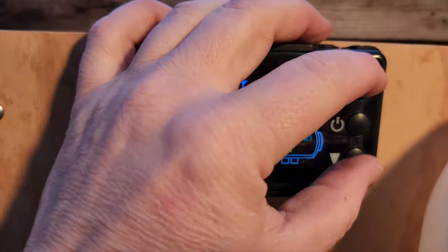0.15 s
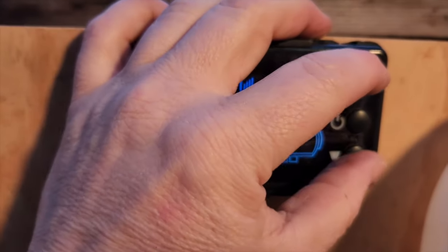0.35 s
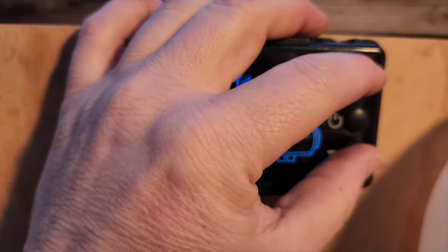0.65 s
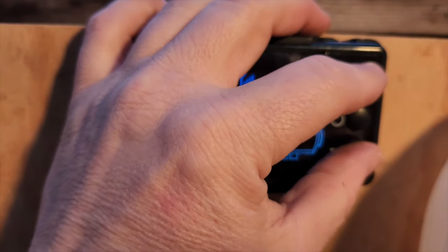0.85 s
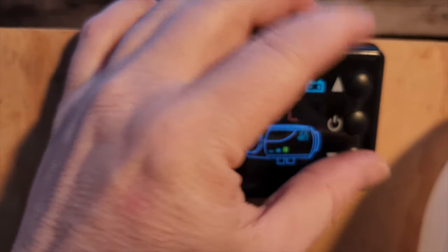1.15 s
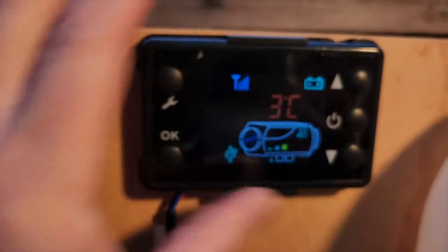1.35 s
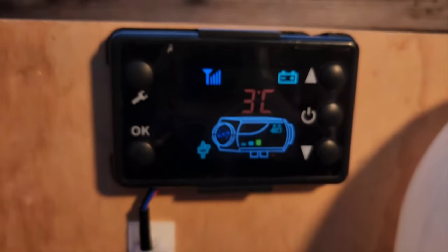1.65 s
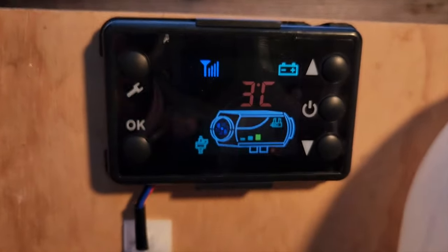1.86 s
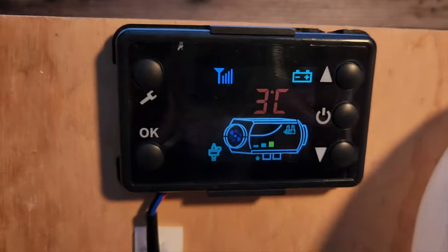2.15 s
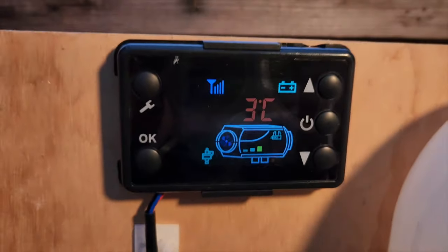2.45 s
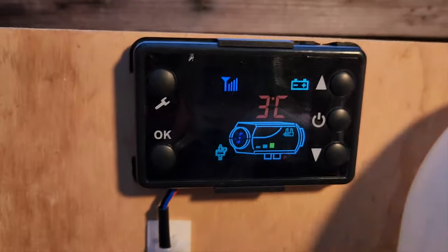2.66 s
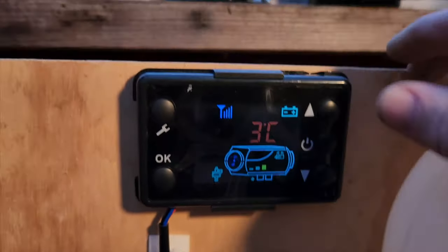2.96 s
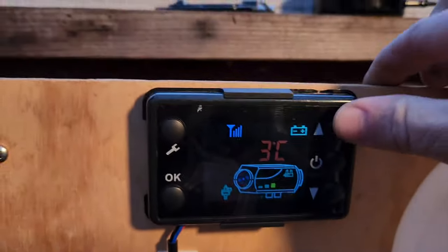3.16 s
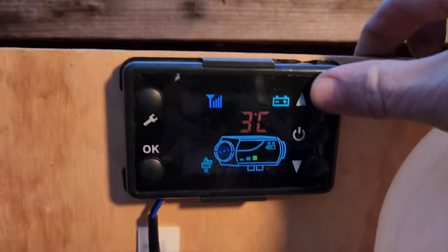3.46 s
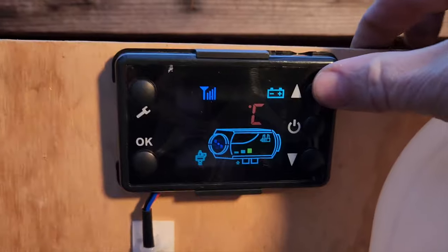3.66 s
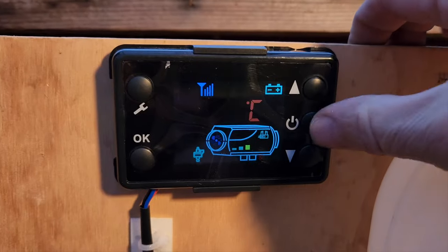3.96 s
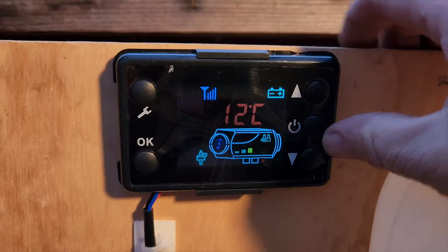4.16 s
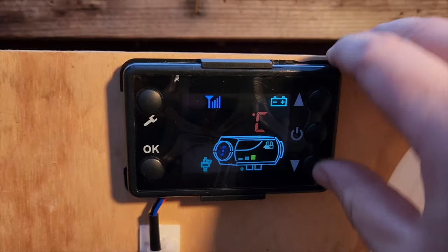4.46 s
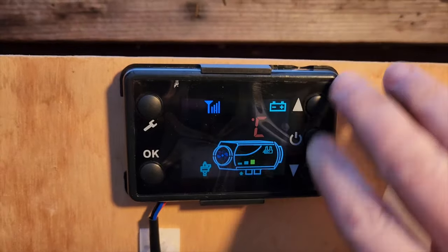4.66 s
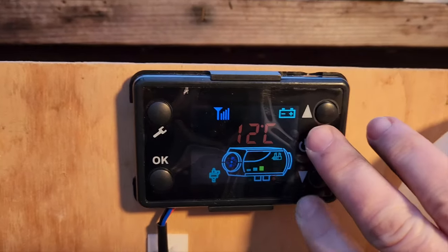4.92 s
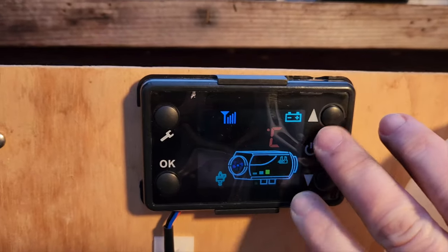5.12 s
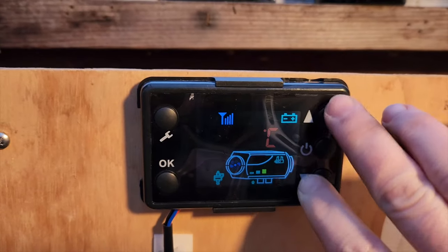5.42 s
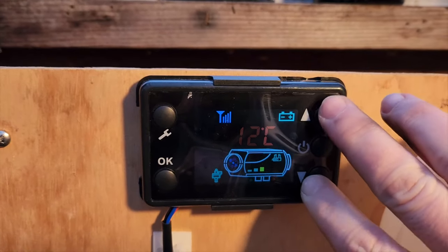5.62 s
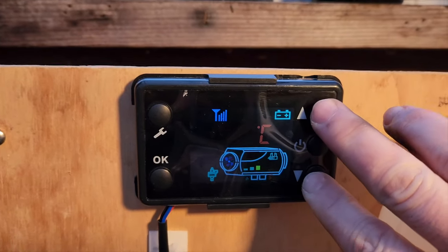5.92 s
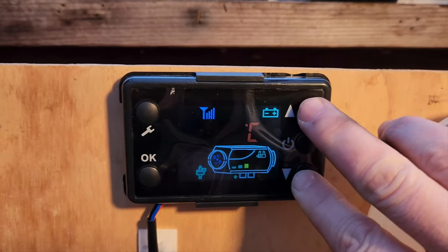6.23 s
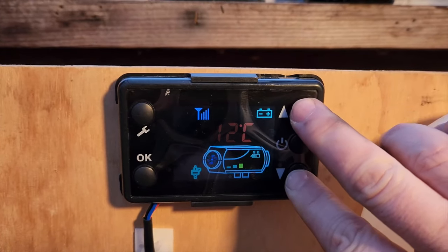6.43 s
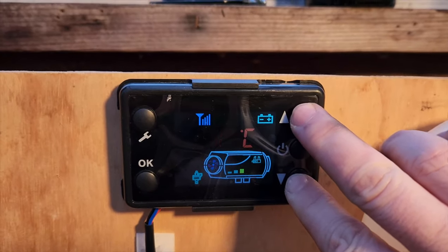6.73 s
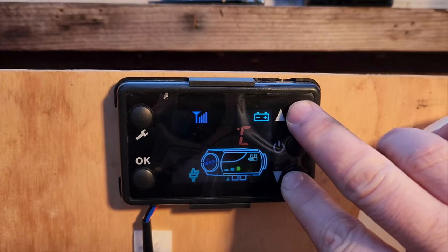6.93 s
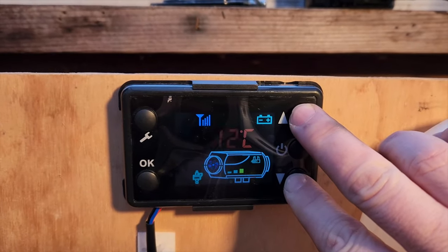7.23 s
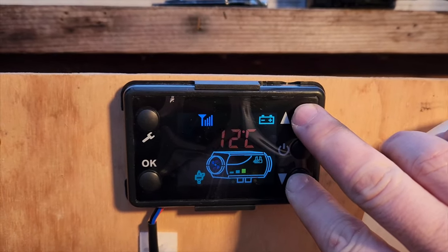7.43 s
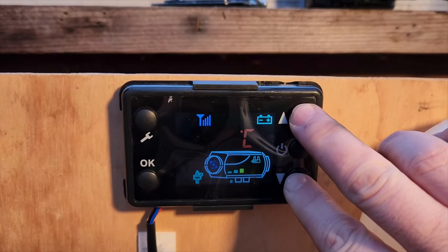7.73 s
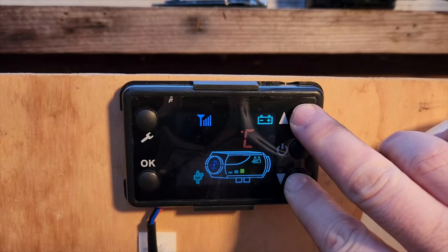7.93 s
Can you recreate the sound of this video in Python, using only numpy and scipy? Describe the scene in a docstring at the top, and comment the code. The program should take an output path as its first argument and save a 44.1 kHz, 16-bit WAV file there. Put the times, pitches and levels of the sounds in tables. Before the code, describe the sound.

For about eight seconds a diesel air heater runs in a small wooden room: a low, boomy exhaust drone near the bottom of hearing, fluttering with brief soft flares, the strongest around 4.9 s, beneath rushing air and a thin blower whine. From 0.25 s the fuel pump ticks evenly, a little over twice a second, each crisp metallic tick followed at once by a duller knock; the beat quickens barely perceptibly after 4.7 s. Close by, a hand works a plastic panel: faint clicks at the start, more at 0.7-1.1 s with a scuff, a cluster at 2.3-2.7, soft bumps near 2.9, strong clicks at 3.3 and 4.5, small ones around 5.3, another at 6.45. Sleeve rustle comes at 1.2 s and intermittently from 1.8 to 4.8. A faint skin squeak creeps in around 7.3-7.7 s. Short, diffuse room echoes.

```python
"""A flame drones in an exhaust pipe and a blower whines faintly: a diesel air heater in a small wooden room.
The dosing pump ticks a little over twice a second, each stroke followed by its plunger's duller return knock.
Close by, a hand works the plastic control panel: buttons click, skin scuffs and squeaks, a sleeve rustles.
Drone, air and friction are shaped noise; flares are sines; ticks and clicks are impacts with ringing modes."""
import sys
import numpy as np
from scipy import signal
from scipy.fft import rfft, irfft
from scipy.io import wavfile
from scipy.ndimage import uniform_filter1d

SR = 44100
rng = np.random.default_rng(int(sys.argv[2]) if len(sys.argv) > 2 else 0)


def unload_wav(signal):
    """Save mono or channel-first audio to the path in sys.argv[1] as 16-bit WAV at rate SR, clipped to [-1, 1]."""
    wavfile.write(
        sys.argv[1],
        SR,
        np.round(np.clip(np.atleast_2d(signal).T, -1, 1) * 32767).astype(np.int16),
    )


N = 356548

# sound colour of the plastic case: (frequency [Hz], density [dB per Hz])
CASE_COLOUR = [(200, -15.5), (600, -1.5), (1000, 5), (1700, 8), (2400, -0.5), (3800, -2), (5000, -3),
               (6000, -7.5), (7500, -16.5), (9500, -26.5), (12500, -23), (16000, -22.5)]


def gain_of(db):
    """Decibels to amplitude."""
    return 10 ** (np.asarray(db) / 20)


def evened(x):
    """Scales to an rms of one."""
    return x / np.sqrt(np.mean(x ** 2) + 1e-20)


def peaked(x):
    """Scales a stereo hit so that the loudest 2 ms of its middle have an rms of one."""
    return x / np.sqrt(uniform_filter1d(x.mean(0) ** 2, size=88).max())


def read(points, hz):
    """Reads a spectrum on a log-frequency axis."""
    f, value = np.transpose(points)
    return np.interp(np.log(hz + 1), np.log(f + 1), value)


def follow(curve):
    """Reads a curve at every sample."""
    return np.interp(np.arange(N) / SR, *np.transpose(curve))


def ramp(share):
    """A smooth step from zero to one."""
    return np.sin(np.pi / 2 * np.clip(share, 0, 1)) ** 2


def panned(balance_db):
    """Left and right gains for a left-right level difference."""
    return gain_of(np.array([[.5], [-.5]]) * balance_db)


def add(mix, s, sound):
    """Mixes a stereo sound in at time s."""
    part = mix[:, max(round(s * SR), 0):][:, :sound.shape[1]]
    part += sound[:, :part.shape[1]]


def resonant(hz, centre_hz, width_hz):
    """Gain of a resonance with steep skirts; the width is taken at half amplitude."""
    return 1 / (1 + (2 * (hz - centre_hz) / width_hz) ** 2)


def noise(gain):
    """Stereo noise with the spectrum gain(hz), most alike in both ears in the bass; its middle has rms one."""
    # between the two microphones: (frequency [Hz], likeness [0-1])
    likeness = [(80, .995), (150, .97), (280, .82), (550, .68), (1100, .1), (2200, .3), (4500, 0),
                (14000, 0)]
    hz = np.fft.rfftfreq(N, 1 / SR)
    left, other = rfft(rng.standard_normal((2, N)))
    same = np.clip(read(likeness, hz), -1, 1)
    right = same * left + np.sqrt(1 - same ** 2) * other
    x = irfft(np.array([left, right]) * gain(hz), N)
    return x / x.mean(0).std()


def coloured(x, points, size=4096):
    """Causal minimum-phase filter with the given spectrum, so that attacks stay sharp."""
    log_gain = np.log(gain_of(read(points, abs(np.fft.fftfreq(size, 1 / SR)))))
    response = np.exp(np.conj(signal.hilbert(log_gain)))
    taps = np.fft.ifft(response).real[:size // 2]
    return signal.fftconvolve(x, taps[None], axes=1)[:, :x.shape[1]]


def struck(colour, modes, clatter_t60, direct_db, scatter_db, scatter_t60, ring_db, balance_db, edge_db,
           echo_db, size=4096):
    """One blow: edge-filtered impact, its echo, brief clatter, scatter off nearby boards and ringing modes."""
    board_echo_s = 0.00278  # one return off the nearest board
    t = np.arange(size) / SR
    impact = evened(signal.unit_impulse(size, 22) * np.ones((2, 1)))
    impact = coloured(impact, [(2500, 0), (4800, edge_db / 3), (6200, edge_db)])
    impact = impact + gain_of(echo_db) * np.roll(impact, round(board_echo_s * SR), axis=1)
    clatter, scatter = rng.standard_normal((2, 2, size))
    clatter = evened(clatter * gain_of(-60 * t / clatter_t60) * (1 - np.exp(-t / 0.0002)))
    scatter = evened(scatter * gain_of(-60 * t / scatter_t60) * (1 - np.exp(-t / 0.0016)))
    contact = (gain_of(direct_db) * impact + clatter) * panned(balance_db)
    crack = coloured(contact + gain_of(scatter_db) * scatter * panned(5.8), colour)
    ring = np.zeros((2, size))
    for hz, db, t60, pan_db in modes:
        tone = np.sin(2 * np.pi * (hz * t + rng.random((2, 1))))
        ring += panned(pan_db) * gain_of(db - 60 * t / t60) * tone
    return evened(crack) + gain_of(ring_db) * evened(ring * (1 - np.exp(-t / 0.0027)))


def slips(size, grain_db):
    """Friction: countless tiny slips, a few much larger than the rest."""
    return rng.standard_normal((2, size)) * gain_of(grain_db * np.minimum(rng.exponential(1, size), 6))


def fluttering(spectrum, steadiness, size):
    """Low noise fluttering at random; steadiness (0-1) holds its strength over spans longer than size samples."""
    x = noise(lambda hz: gain_of(read(spectrum, hz)) / (1 + (hz / 300) ** 4))
    power = uniform_filter1d(x.mean(0) ** 2, size=size)
    return evened(x / power ** (np.clip(steadiness, 0, 1) / 2))


def burner():
    """Turbulent burning booms in the pipe over a rougher rumble; in a flare it locks onto the pipe's note."""
    # pipe boom, then rumble, ahead of a low-pass: (frequency [Hz], density [dB per Hz])
    boom_colour = [(20, -44.5), (44, -39.5), (54, -20), (66, -17), (74, -4.5), (79, -0.5), (86, -9.5),
                   (96, -22.5), (120, -37), (200, -76.5)]
    rumble_colour = [(60, -54.5), (85, -5.5), (98, -3), (110, 0), (134, -6), (160, -13), (220, -35.5)]
    # flare-ups: (time of the top [s], length [s], level [dB])
    flares = [(0.68, 0.4, -22.5), (1.11, 0.26, -23.5), (2.0, 0.26, -23), (2.46, 0.2, -23),
              (3.2, 0.26, -23.5), (4.89, 0.32, -19), (5.37, 0.3, -24.5), (6.74, 0.24, -23),
              (7.88, 0.28, -23.5)]
    boom_db, ease_db_per_s, rumble_db = -26, -0.3853, -29.5
    pipe_hz, pipe_spread = 79.2, 0.03  # spread as a share of the note
    t = np.arange(N) / SR
    boom = fluttering(boom_colour, steadiness=0.89, size=7000) * gain_of(boom_db + ease_db_per_s * t)
    for (s, length_s, db), (detune, phase) in zip(flares, rng.uniform(-1.01, 1, (len(flares), 2))):
        lock = ramp(1 - 2 * abs(t - s) / length_s)
        note_hz = pipe_hz * (1 + pipe_spread * detune)
        note = evened(np.sin(2 * np.pi * (note_hz * (t - s) + phase)))
        boom = boom * np.sqrt(1 - lock ** 2) + gain_of(db) * lock * note
    # the room's lowest resonance
    room_mode = gain_of(-51.5) * noise(lambda hz: resonant(hz, centre_hz=35.7, width_hz=7))
    rumble = gain_of(rumble_db) * fluttering(rumble_colour, steadiness=0.72, size=12000)
    return boom + room_mode + rumble


def stroke_times():
    """An even beat that quickens slightly when the controller raises the dose."""
    first_stroke_s, dose_up_s = 0.2522, 4.68
    slow_period_s, fast_period_s = 0.44277, 0.43848
    before = np.arange(first_stroke_s, dose_up_s - slow_period_s / 2, slow_period_s)
    after = np.arange(dose_up_s, N / SR, fast_period_s)
    return np.concatenate([before, after])


def pump():
    """The solenoid slams its plunger home; the spring brings it back with a softer, duller knock."""
    # bare impact, then return knock: (frequency [Hz], density [dB per Hz])
    slam_colour = [(400, -8), (800, -2.5), (1600, -1.5), (2600, -0.5), (3800, -0.5), (4900, -1),
                   (5700, -13.5), (7500, -14.5), (9000, -22), (12400, -10.5), (14000, -14), (16000, -14)]
    knock_colour = [(400, -11.5), (900, -2), (1700, 7), (2500, 10), (3300, -13), (4400, -12.5), (6000, -23),
                    (7400, -19.5), (9000, -42), (13000, -30), (16000, -34.5)]
    # pump and bracket ring: (frequency [Hz], level [dB], t60 [s], left-right [dB])
    pump_modes = [(760, -9, .025, 2), (1040, -7, .025, 3), (1350, 1, .028, 8), (1600, -8, .022, 9),
                  (1800, -6, .02, 9), (2200, -2, .02, 2), (2420, -4, .02, 6), (2700, -6, .018, 2),
                  (2990, -4.5, .022, 5), (3570, 2, .022, 3), (4050, -2, .02, -4), (4350, -4, .02, -3),
                  (4700, -1, .022, 0), (5000, -5, .02, 7), (6020, -14, .022, 10), (7300, -18, .02, 10),
                  (12400, -11, .012, 8)]
    dull_modes = [(hz, db + read(knock_colour, hz), t60, pan_db) for hz, db, t60, pan_db in pump_modes]
    slam_db, knock_db, spread_db = -21, -27, 0.23
    rise_db_per_s = 0.12  # the microphone drifts
    return_s, change_db = .0523, -5

    def slam():
        return peaked(struck(slam_colour, pump_modes, clatter_t60=.007, direct_db=2, scatter_db=6,
                             scatter_t60=.026, ring_db=-4, balance_db=9, edge_db=-8, echo_db=-12))

    def knock():
        return peaked(struck(knock_colour, dull_modes, clatter_t60=0.0097, direct_db=8.0, scatter_db=14.0,
                             scatter_t60=0.013, ring_db=-7.0, balance_db=8.5, edge_db=0.5, echo_db=-15))

    out, usual_slam, usual_knock = np.zeros((2, N)), slam(), knock()
    for s in stroke_times():
        db = rise_db_per_s * s + spread_db * rng.standard_normal()
        # the plunger never seats quite the same way twice
        stroke = peaked(usual_slam + gain_of(change_db) * slam())
        rebound = peaked(usual_knock + gain_of(change_db) * knock())
        add(out, s, gain_of(slam_db + db) * stroke)
        add(out, s + return_s, gain_of(knock_db + db) * rebound)
    return out


def panel():
    """Buttons and case click, some brighter than others; the hand bumps softly."""
    # button and case clicks: (time [s], level before click_trim_db [dB], treble before scaling [dB])
    clicks = [(0.0458, -36, -33), (0.1322, -32.5, -30), (0.713, -28, -17), (0.7601, -23, -15),
              (1.0812, -23.5, -35), (1.1086, -38, -2), (2.293, -31.5, -18), (2.3168, -32, -17),
              (2.3485, -22.5, -9), (2.3787, -33, -25), (2.39, -30, 6), (2.5524, -30, -20),
              (2.5806, -26.5, 53), (2.685, -39.5, -8), (3.146, -27.5, -23), (3.3273, -15, -15),
              (3.4518, -26, -35), (4.4566, -16, -7), (4.4617, -18, -12.5), (4.558, -21, -20),
              (4.6021, -20.5, -26), (4.651, -27, -34), (5.2862, -27.5, -29), (5.336, -32, -27),
              (5.365, -34, -19), (6.4521, -17, -15)]
    # plastic case on its board: (frequency [Hz], level [dB], t60 [s], left-right [dB])
    case_modes = [(860, -7, 0.017, -17), (1288, 0, .04, 9.5), (1773, 6, 0.038, 0.5), (2670, -23, 0.027, 7),
                  (3900, -2, 0.052, -5.5), (4630, 0.5, 0.04, -6.5), (5920, -17.5, 0.022, 0),
                  (7700, -12, 0.032, 15.5)]
    # hand bumps: (time [s], level before bump_trim_db [dB])
    bumps = [(0.748, -28), (1.082, -31), (2.872, -18.5), (2.892, -20), (3.328, -25), (3.451, -28),
             (4.458, -25), (6.454, -23.5)]
    click_trim_db, bump_trim_db = -4, -3
    usual_treble_db, bright_share = -21, 0.89
    out = np.zeros((2, N))
    for s, db, treble_db in clicks:
        click = struck(CASE_COLOUR, case_modes, clatter_t60=0.0066, direct_db=5.0, scatter_db=8.5,
                       scatter_t60=0.018, ring_db=-8.5, balance_db=3, edge_db=-0.5, echo_db=-17.5)
        click = coloured(click, [(1300, 0.017), (10000, bright_share * (treble_db - usual_treble_db))])
        add(out, s, gain_of(db + click_trim_db) * peaked(click))
    t = np.arange(4096) / SR
    bump_colour = [(60, -15), (170, 10.5), (300, 2.5), (700, -21.5), (2500, -37.5), (8000, -58.5)]
    for s, db in bumps:
        push = rng.standard_normal(len(t)) * gain_of(-60 * t / 0.047) * panned(1.5)
        add(out, s, gain_of(db + bump_trim_db) * peaked(coloured(push, bump_colour)))
    return out


def fingers():
    """Skin scuffs the case in short gritty strokes, and squeaks faintly as it creeps on a held button."""
    # scuffs: (time [s], length [s], level before panning and fades [dB])
    scuffs = [(1.051, 0.085, -46.5), (2.864, 0.046, -38.5), (4.439, 0.05, -35), (4.548, 0.17, -49),
              (5.265, 0.14, -48.5)]
    # creeping fingertip: (time [s], level [dB])
    creep = [(7.28, -85), (7.35, -46), (7.45, -59.5), (7.62, -48), (7.72, -61), (7.78, -83)]
    # its squeak: (frequency [Hz], width [Hz], level [dB])
    squeak_bands = [(1930, 270, 3.5), (3180, 250, -5.5), (4260, 510, -12), (6100, 290, -19.5)]

    def squeak_gain(hz):
        return panned(3) * sum(gain_of(db) * resonant(hz, centre, width) for centre, width, db in squeak_bands)

    out = noise(squeak_gain) * gain_of(follow(creep))
    for s, length_s, db in scuffs:
        size = round(length_s * SR)
        grit = coloured(slips(size, grain_db=4), CASE_COLOUR)
        grit = coloured(grit, [(1200, -1), (8000, -5)])
        add(out, s, gain_of(db) * evened(grit) * panned(13.0) * np.sqrt(np.hanning(size)))
    return out


def arm_movement():
    """Strength of the sleeve's rubbing: each brush sets in, is fastest near its middle and falls away."""
    # sleeve brushes: (time [s], length [s], level before fades and sleeve gain [dB])
    brushes = [(1.212, 0.11, -52), (1.75, 0.28, -68.5), (1.929, 0.26, -54.5), (2.092, 0.71, -62),
               (2.72, 0.52, -55.5), (3.61, 0.38, -59.5), (3.97, 0.47, -53.5), (4.319, 0.48, -49)]
    rise_s, fall_s, ends_db, resting_db = 0.085, 0.092, -12, -83.5
    t = np.arange(N) / SR
    out = gain_of(resting_db)
    for s, length_s, db in brushes:
        off_middle = 2 * (t - s) / length_s - 1
        speed = gain_of(db + ends_db * off_middle ** 2)
        out = out + speed * ramp((t - s) / rise_s) * ramp((s + length_s - t) / fall_s)
    return out


def sleeve():
    """Cloth slides in tiny slips, a fizz that follows the arm and catches unevenly."""
    # cloth fizz: (frequency [Hz], density [dB per Hz])
    cloth_colour = [(600, -5), (1500, 3), (2500, 3.5), (4500, 6.5), (6000, -5), (7600, -2), (9400, -10.5),
                    (12500, -1), (16000, -7)]
    level_db, flutter_db, catch_db = 7.0, 1.7, -0.5
    fizz = evened(coloured(slips(N, grain_db=3.5), cloth_colour))
    flutter = evened(uniform_filter1d(rng.standard_normal(N), size=1500))
    catch = evened(uniform_filter1d(rng.standard_normal(N), size=150))
    unevenness = gain_of(level_db + flutter_db * flutter + catch_db * catch)
    return fizz * panned(6.0) * arm_movement() * unevenness


def blower():
    """Rushing air, with whining resonances that grow or fade as the microphone drifts along the board."""
    # air in blower and ducts, ahead of the band edges: (frequency [Hz], density [dB per Hz])
    air_colour = [(90, -3.5), (170, -5), (255, 1), (345, -1), (380, -10), (470, -10.5), (600, -12),
                  (760, -11), (1060, -18), (1500, -22), (1680, -24.5), (2000, -24), (2500, -24),
                  (2800, -33.5), (4700, -37), (6200, -61.5)]
    # its stereo balance: (frequency [Hz], left-right [dB])
    air_balance = [(100, 4), (170, 10.5), (260, 3.5), (330, 0.5), (450, 4), (1400, 0), (2200, 14),
                   (4300, -3.5), (6500, 13)]
    # whine and duct resonances: (frequency [Hz], width [Hz], level [dB], left-right [dB], start-to-end drift [dB])
    whine_bands = [(538, 24, -55, 8, -6), (598.6, 40, -54, 0.5, -0.5), (720, 35, -56.5, 5, 2.5),
                   (1210.5, 53, -49.5, 8, -0.5), (1260, 76, -55.5, 8.5, -4), (1406, 59, -54.5, 23, 6),
                   (1533, 60, -61, 16.5, 5), (2245, 450, -61, -22.5, -18), (3270, 510, -68.5, -14.5, -11.5),
                   (3650, 440, -72, 11.5, 9.5), (4280, 15, -78, -11.5, 6), (4930, 12, -79.5, 2, 1)]

    def air_gain(hz):
        band_edges = hz / (hz + 60) / (1 + (hz / 8000) ** 8)
        return gain_of(read(air_colour, hz)) * panned(read(air_balance, hz)) * band_edges

    out = gain_of(-37.5) * noise(air_gain)
    place = np.linspace(-.5, .5, N)
    for centre, width, db, pan_db, drift_db in whine_bands:
        whine = noise(lambda hz: panned(pan_db) * resonant(hz, centre, width))
        out += gain_of(db + drift_db * place) * whine
    return out


def room(x, size=22050):
    """A short diffuse tail, each band dying at its own speed; its fine pattern shifts as the microphone sways."""
    # decay: (frequency [Hz], t60 [s])
    room_t60 = [(200, 0.1), (1500, 0.17), (4500, 0.31), (8000, 0.21), (15000, 0.19)]
    out = np.zeros((2, N))
    for sway in (np.cos, np.sin):  # two tails trade places at 1 rad/s
        hz, t, z = signal.stft(rng.standard_normal((2, size)), SR, nperseg=256)
        decay = gain_of(-60 * t / read(room_t60, hz)[:, None]) * (1 - np.exp(-t / 0.0011))
        tail = signal.istft(z * decay, SR, nperseg=256)[1]
        tail = coloured(tail, [(1000, 5.5), (3000, -1.5), (4500, 0), (7500, 4.5), (12000, -2)])
        tail = tail / np.linalg.norm(tail[0])
        out += signal.fftconvolve(x * sway(np.arange(N) / SR), tail, axes=1)[:, :N]
    return out


def scene():
    """The steady heater, with the pump's ticks and the panel's clicks and bumps echoing in the room."""
    ticks, clicks = pump(), panel()
    echoes = room(gain_of(-10.5) * ticks + gain_of(-15) * clicks)
    return burner() + ticks + clicks + fingers() + sleeve() + blower() + echoes


def record(dry):
    """The recorder's band limit: a linear-phase low-pass."""
    edge_hz = 16200
    lowpass = signal.firwin(255, edge_hz, window=("kaiser", 9), fs=SR)
    return signal.oaconvolve(dry, lowpass[None], "same")


dry = scene()
out = record(dry)
unload_wav(out)
```